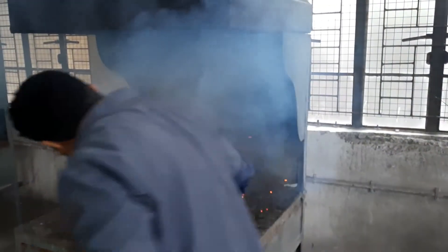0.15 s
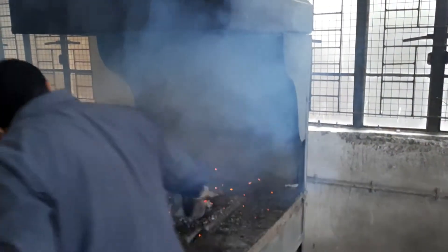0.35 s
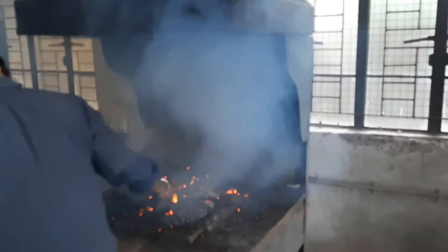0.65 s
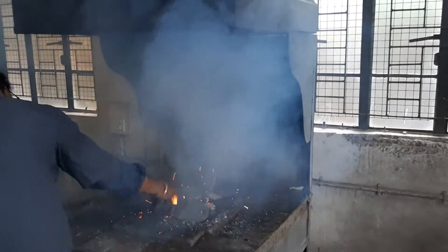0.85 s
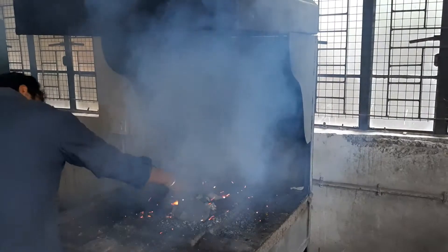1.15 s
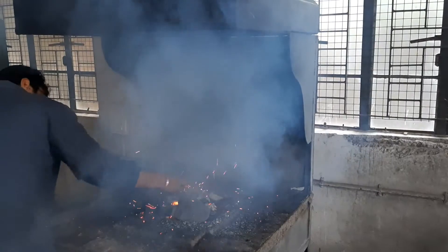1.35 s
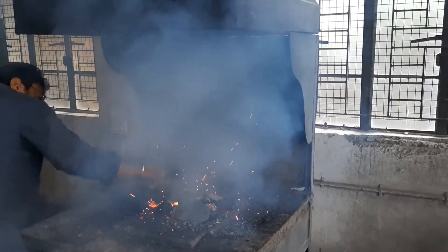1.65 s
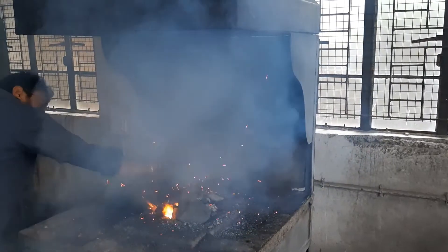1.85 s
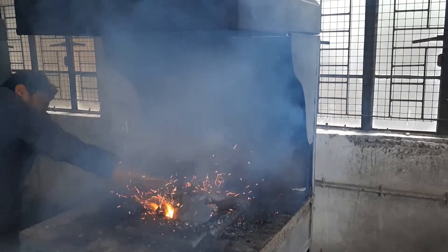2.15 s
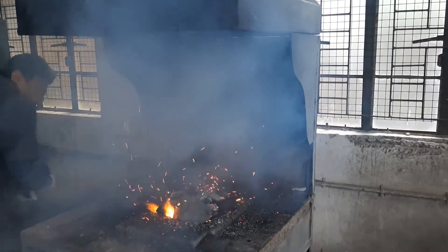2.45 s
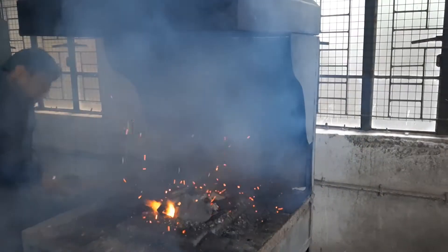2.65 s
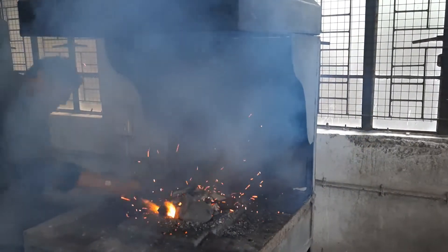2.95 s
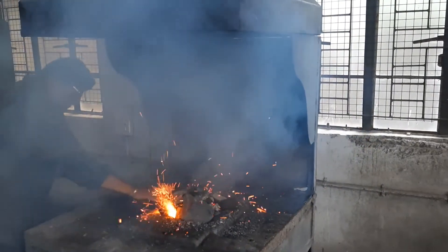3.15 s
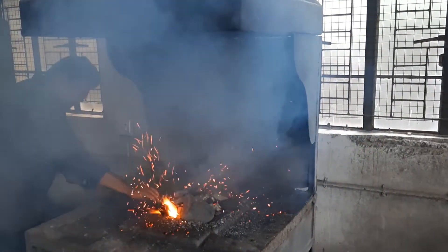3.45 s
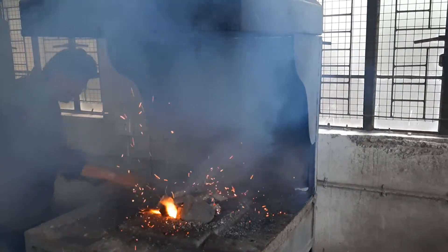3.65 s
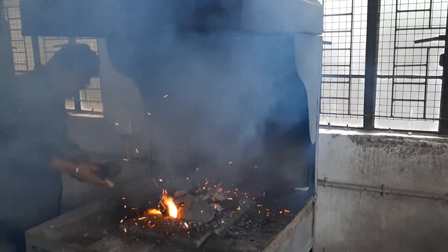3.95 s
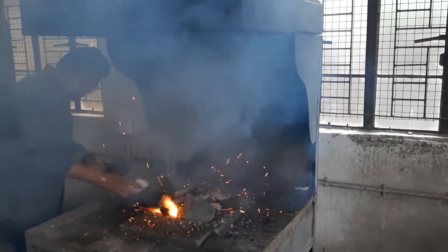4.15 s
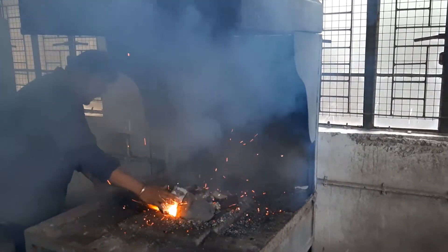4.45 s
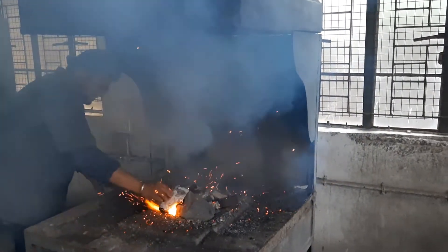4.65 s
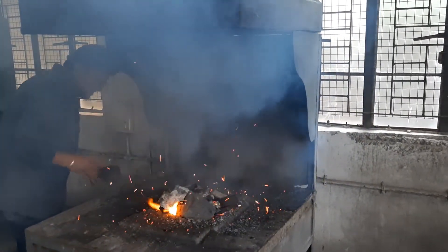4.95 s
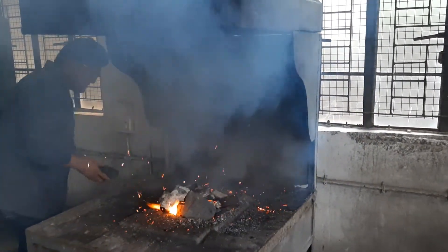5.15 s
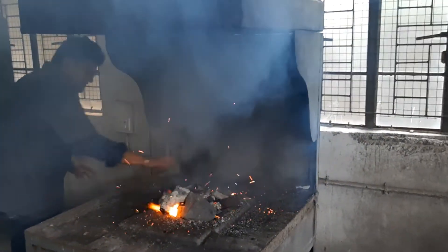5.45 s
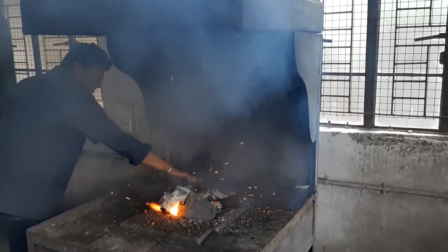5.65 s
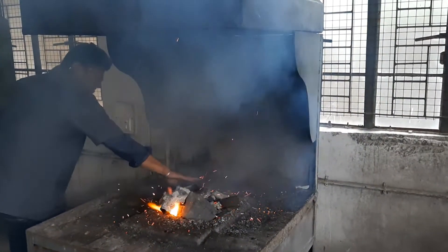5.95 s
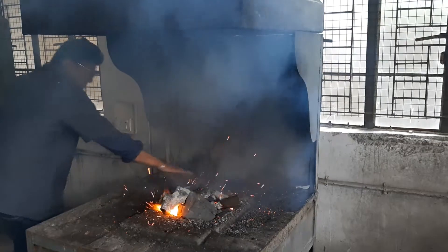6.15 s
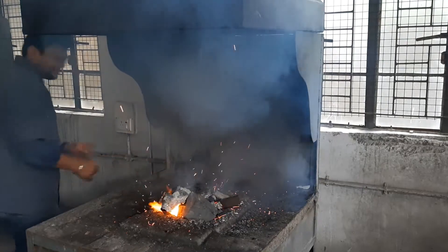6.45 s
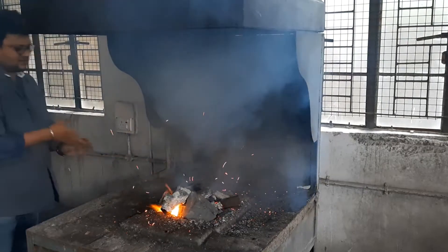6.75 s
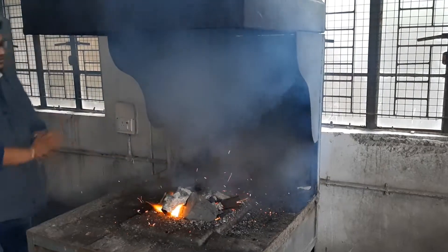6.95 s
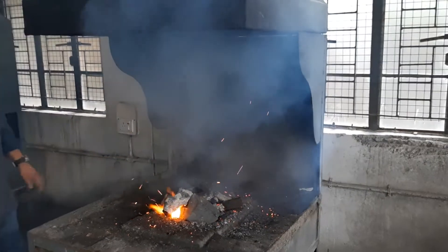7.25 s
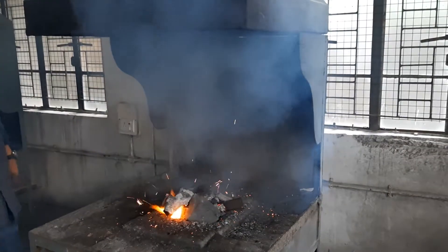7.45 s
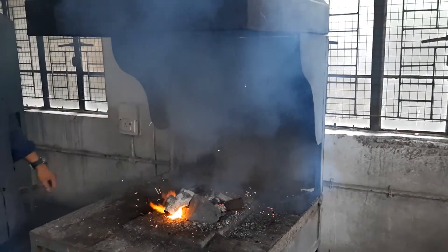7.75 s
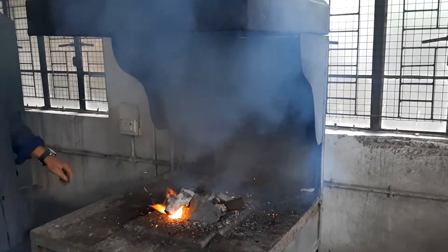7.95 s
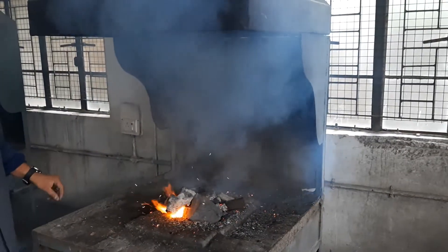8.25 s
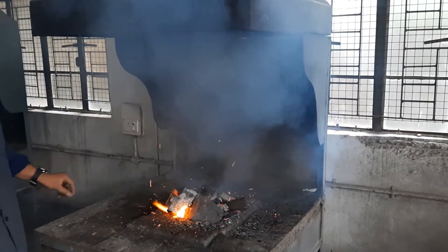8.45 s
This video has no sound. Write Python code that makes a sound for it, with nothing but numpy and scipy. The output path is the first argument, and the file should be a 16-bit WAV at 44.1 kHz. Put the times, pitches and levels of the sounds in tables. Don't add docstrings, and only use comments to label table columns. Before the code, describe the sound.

An electric blower hums steadily at a low pitch over a roaring, hissing rush of air through a coal fire, with sparse ticks and cracks.

```python
import sys
import numpy as np
from scipy import signal
from scipy.fft import rfft, irfft
from scipy.io import wavfile
from scipy.ndimage import uniform_filter1d

SR = 44100
rng = np.random.default_rng(int(sys.argv[2]) if len(sys.argv) > 2 else 0)


def dump(signal):
    limited = np.clip(np.atleast_2d(signal).T, -1, 1)
    pcm = np.round(limited * 32767).astype(np.int16)
    wavfile.write(sys.argv[1], SR, pcm)


def invert_db(level):
    return 10 ** (np.asarray(level, dtype=float) / 20)


N = 379769

SHAFT_HZ, BLADES = 48.026, 6

# time_s, fire_db
FIRE = [
    (0, -4),
    (1.1, -4),
    (2, -2.5),
    (3.7, -0.5),
    (4.4, -1),
    (5.6, 2),
    (6.4, 2),
    (7.6, 4.5),
    (8.61, -3),
]


def evened(x):
    return x / np.sqrt(np.mean(x ** 2) + 1e-20)


def smoothed(x, size, axis=-1):
    return uniform_filter1d(x, size=size, axis=axis)


def read(points, hz):
    f, value = np.transpose(points)
    return np.interp(np.log(hz + 1), np.log(f + 1), value)


def curve(table, column):
    rows = np.array(table)
    return np.interp(np.arange(N) / SR, rows[:, 0], rows[:, column])


def sides(pan_db):
    return np.array([invert_db(pan_db / 2), invert_db(-pan_db / 2)])


def add(mix, start_s, pan_db, sound):
    at = round(start_s * SR)
    mix[:, at:at + len(sound)] += sides(pan_db)[:, None] * sound


def band(x, lo_hz, hi_hz):
    sos = signal.butter(2, [lo_hz, min(hi_hz, 0.45 * SR)], "bandpass", fs=SR, output="sos")
    return signal.sosfilt(sos, x)


def bump(hz, centre_hz, width_hz):
    return 1 / (1 + (2 * (hz - centre_hz) / width_hz) ** 2)


def waver(count):
    hz = np.geomspace(0.1, 1.0, 16) * 7
    t = np.arange(0, N + 256, 256) / SR
    phases = rng.random((count, 16, 1))
    waves = np.sin(2 * np.pi * (hz[:, None] * t + phases))
    slow = (waves / hz[:, None] ** 0.46).sum(axis=1)
    return [np.interp(np.arange(N) / SR, t, evened(row)) for row in slow]


def hum():
    # time_s, level_db, left_minus_right_db
    blade_tone = [(0, -20.5, 4), (.29, -20, 3), (.55, -24, 6), (.72, -20, 2.5), (1.6, -21, 3),
                  (2.3, -20.5, 4.5), (3, -21, 3.8), (3.9, -22, 4), (4.9, -21, 4.2), (5.5, -21.5, 4),
                  (8.61, -20.5, 4.3)]
    turn = 2 * np.pi * SHAFT_HZ * BLADES * np.arange(N) / SR
    lag = np.array([[0], [0.12]])
    first, second, lean = waver(count=3)
    level = invert_db(curve(blade_tone, column=1) + 0.5 * first)
    tone = level * sides(curve(blade_tone, column=2) + 0.5 * lean) * np.sin(turn + lag)
    octave = invert_db(-32.5 + 1.25 * second) * sides(0.7)[:, None] * np.sin(2 * turn + 3.6 * lag + 1.2)
    return np.sqrt(2) * (tone + octave)


def shaft_orders():
    # order, level_db, width_hz, left_minus_right_db
    weak_orders = [(5, -36.5, 11, 1), (7, -30.5, 9.5, -5), (13, -43, 4.8, -2)]
    turn = 2 * np.pi * SHAFT_HZ * np.arange(N) / SR
    third_db = -38.5 + 0.72 * curve(FIRE, column=1)
    out = np.zeros((2, N))
    for order, level_db, width_hz, pan_db in weak_orders + [(3 * BLADES, third_db, 4, 2)]:
        drift = rng.standard_normal((2, N)) + 1j * rng.standard_normal((2, N))
        pole = np.exp(-np.pi * width_hz / SR)
        drift = signal.lfilter([np.sqrt(1 - pole ** 2)], [1, -pole], drift)
        drift[1] = 0.57 * drift[0] + 0.28 * drift[1]
        line = (0.58 + 0.53 * drift) * np.exp(1j * order * turn)
        out += invert_db(level_db) * sides(pan_db)[:, None] * line.real
    return np.sqrt(2) * out


def turbulence(patchy_db, flicker_db):
    frames = N // 128 + 8
    a, b, c, d, patches = rng.standard_normal((frames, 257, 5)).T
    patches = evened(smoothed(smoothed(patches, 8, axis=0), 20, axis=1))
    flicker = evened(smoothed(rng.standard_normal(frames), 12))
    eddies = np.array([a + 1j * b, c + 1j * d]) * invert_db(patchy_db * patches + flicker_db * flicker)
    return signal.istft(eddies, nperseg=512, noverlap=384)[1][:, :N]


def diffuse(noise, colour_db, hz):
    # pitch_hz, correlation
    likeness = [(60, 0.88), (92, 1), (140, 0.96), (210, 1), (330, 0.83), (500, 0.77), (770, 0.59),
                (1170, -0.098), (1790, 0.15), (2740, 0.12), (4190, -0.26), (6410, -0.18), (9810, 0.17),
                (15000, 0.23)]
    # pitch_hz, left_minus_right_db
    balance = [(60, 1.5), (110, 2), (200, 1.5), (380, 2.5), (700, 0.5), (1290, 3.5), (2380, 1.5),
               (4400, -2), (8120, 3.5), (15000, 0)]
    first, second = rfft(noise, axis=1) * invert_db(colour_db)
    same = np.clip(read(likeness, hz), -1, 1)
    pair = np.array([first, same * first + np.sqrt(1 - same ** 2) * second])
    return evened(irfft(pair * sides(read(balance, hz)), N, axis=1))


def air():
    # pitch_hz, width_hz, level_db above the broad noise
    resonances = [(43, 6, 5), (125.3, 1.1, 16), (193.7, 3.9, 7.5), (219.3, 7.7, 10), (305, 6.8, 7.5),
                  (366.2, 4.6, 13.5), (386, 4.2, 5.5), (408.3, 10.8, 7), (482, 15, 5), (506, 5.9, 4.5),
                  (657, 32, 5.5), (621, 11, -3.5), (752, 8.2, 8.5), (779, 2.3, 9.5), (815, 30, 4.5),
                  (1070, 6.9, 4.5), (1334, 26, 4), (1477, 68, 3.5), (1822, 104, 3), (2034, 38, 5.5),
                  (2420, 48, 6.5), (2700, 40, 1), (3170, 32, 1.5), (6350, 230, 3)]
    # pitch_hz, density_db
    roar_colour = [(30, -50), (39, -20), (60, -23), (100, -16.5), (162, -17.5), (232, -15.5), (287, -10),
                   (345, -16.5), (399, -12), (445, -22), (560, -18.5), (860, -17.5), (1100, -28.5),
                   (1600, -79)]
    # pitch_hz, density_db
    hiss_colour = [(590, -31.5), (1000, -1.5), (1650, -4), (2180, -12), (3100, -14), (3640, -19),
                   (5000, -17.5), (7700, -23), (8400, -37), (9000, -38.5), (10000, -35), (12200, -32.5),
                   (15000, -41), (16000, -36)]
    hz = np.fft.rfftfreq(N, 1 / SR)
    gain = 1 + sum((invert_db(db) ** 2 - 1) * bump(hz, f, width) for f, width, db in resonances)
    ripple = evened(smoothed(smoothed(rng.standard_normal(len(hz)), 90), 90))
    duct_db = 10 * np.log10(gain) + 1.25 * ripple * (hz > 900)
    roar = diffuse(turbulence(patchy_db=-0.45, flicker_db=-1.46), read(roar_colour, hz) + duct_db, hz)
    hiss = diffuse(turbulence(patchy_db=0.78, flicker_db=-0.12), read(hiss_colour, hz) + duct_db, hz)
    flame = irfft(rfft(roar, axis=1) * bump(hz, 115, 100) ** 2, N, axis=1)
    hood = irfft(rfft(roar, axis=1) * bump(hz, 380, 130) ** 2, N, axis=1)
    fire_db = curve(FIRE, column=1)
    roar += flame * (invert_db(fire_db) - 1) + hood * (invert_db(1 - 0.22 * fire_db) - 1)
    return roar * invert_db(-26 - 0.015 * fire_db) + hiss * invert_db(-31.5 + 0.019 * fire_db)


def snaps():
    # start_s, treble_db, left_minus_right_db
    sparks = [(.6305, -50, -2), (.6672, -57, 0), (3.0697, -46, 6), (3.0793, -46, -2), (3.8772, -34, 0),
              (3.8875, -46, 1), (4.383, -45, 0), (5.648, -49, -1), (5.942, -51, -2), (6.969, -53, -1),
              (7.0466, -37, 7), (7.0525, -49, 1), (7.9893, -45, 1)]
    # level_db added to the spark's treble_db, pitch_hz, width_hz
    spark_ring = (1.5, 5000, 2200)
    # start_s, ring_db, pitch_hz, width_hz, left_minus_right_db
    knocks = [(.8377, -13, 1450, 150, 6), (.8372, -16.5, 2200, 300, -1), (1.964, -26, 3900, 500, -1),
              (1.98, -31, 4450, 250, -2), (3.0695, -10, 1050, 800, 6), (3.0712, -15, 1700, 500, 1),
              (3.0716, -27, 4500, 3000, 2), (3.8655, -26, 7500, 1500, -4), (3.8772, -19, 5300, 1500, 0),
              (3.8775, -16, 7560, 1500, 1), (4.4, -37, 4200, 1500, 0), (5.519, -30, 4200, 3000, 0),
              (5.648, -29, 1900, 900, -1), (6.967, -31, 4800, 1500, -1), (7.0464, -12, 6800, 3400, 7),
              (7.991, -17, 4800, 1000, -1)]
    # delay_s, level_db
    hearth_echo = (.0024, -5)
    ring_over_db, spark_hz, spark_width_hz = spark_ring
    delay_s, echo_db = hearth_echo
    out, t = np.zeros((2, N)), np.arange(2048) / SR
    tick = band(band(1.0 * (t == 0), 11000, 16000), 10000, 17000)
    tick /= abs(tick).max()
    rows = [(s, db, db + ring_over_db, spark_hz, spark_width_hz, pan_db) for s, db, pan_db in sparks]
    rows += [(s, db - 45, db, *ring) for s, db, *ring in knocks]
    for start_s, treble_db, ring_db, hz, width_hz, pan_db in rows:
        decay = np.exp(-np.pi * width_hz * t)
        onset = 1 - np.exp(-6.0 * width_hz * t)
        ring = -2 * np.sin(2 * np.pi * hz * t) * decay * onset
        sound = invert_db(treble_db + 14.5) * tick + invert_db(ring_db) * ring
        rubble = rng.standard_normal(90) * np.exp(-np.arange(90) / 35) * 0.07
        sound += signal.oaconvolve(sound, rubble)[:len(t)]
        dulled = signal.lfilter([0.5, 0.5], [1], sound)
        add(out, start_s, pan_db, sound + invert_db(echo_db) * np.roll(dulled, round(delay_s * SR)))
    return out


def scuffs():
    # start_s, length_s, treble_db, coarseness_db, left_minus_right_db
    slides = [(.632, .046, -49, 4, 1), (.846, .03, -70, 24, 0), (1.145, .012, -56, 3, -6),
              (1.162, .01, -45, -5, -4), (1.958, .016, -38, 10, 6), (1.98, .045, -49, 10, -1),
              (2.655, .015, -55, 5, -3), (4.386, .03, -52, 4, 0), (5.644, .025, -51, 14, 2),
              (6.688, .022, -55, 8, -2), (6.965, .007, -52, 9, -2), (7.655, .012, -56, 8, 0)]
    out, t = np.zeros((2, N)), np.arange(8192) / SR
    for start_s, length_s, treble_db, coarse_db, pan_db in slides:
        mid_db = treble_db + 0.59 * coarse_db
        low_db = treble_db + coarse_db
        noise, lumps = rng.standard_normal((8192, 2)).T
        grit = noise * invert_db(4.0 * evened(smoothed(lumps, 40)))
        sound = invert_db(treble_db + 2) * evened(band(band(grit, 8700, 16000), 8100, 17000))
        sound += invert_db(mid_db + 2.0) * evened(band(grit, 3200, 7900))
        sound += invert_db(low_db + 3.5) * evened(band(grit, 1250, 2130))
        swell = (1 - np.exp(-t / 0.0014)) * np.exp(-(t / length_s) ** 2)
        add(out, start_s, pan_db, sound * swell)
    return out


def walls(x):
    t = np.arange(12000) / SR
    decay = invert_db(-60 * t / 0.4) * (1 - np.exp(-t / 0.0025))
    tail = rng.standard_normal((2, 12000)) * decay
    return signal.fftconvolve(x, tail / np.linalg.norm(tail[0]), axes=1)[:, :x.shape[1]]


def coal():
    sharp, soft = snaps(), scuffs()
    tail = walls(invert_db(-10) * sharp + invert_db(-3.5) * soft)
    port = signal.iirnotch(8750, 5, SR)
    return signal.lfilter(*port, sharp + soft + tail)


def scene():
    return hum() + shaft_orders() + air() + coal()


def roll_off(x):
    return signal.sosfilt(signal.butter(12, 15760, fs=SR, output="sos"), x)


def record(dry):
    return roll_off(dry)


dry = scene()
out = record(dry)
dump(out)
```